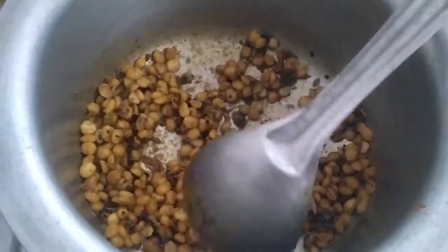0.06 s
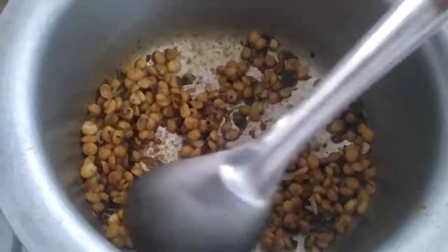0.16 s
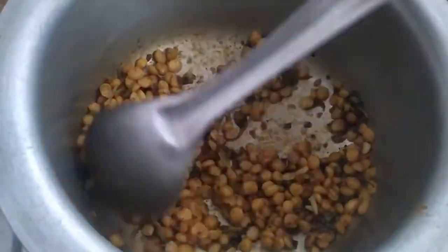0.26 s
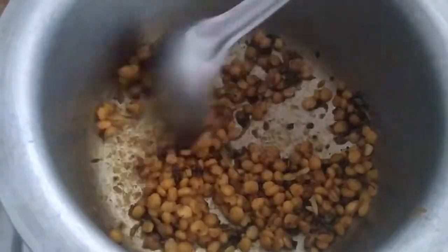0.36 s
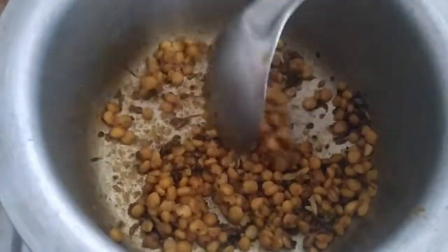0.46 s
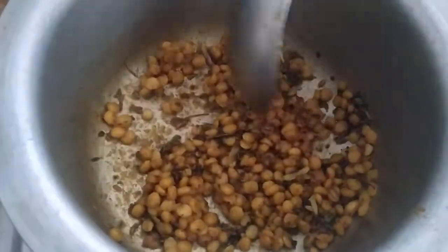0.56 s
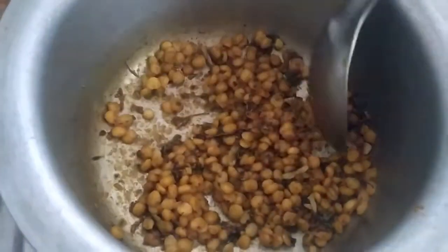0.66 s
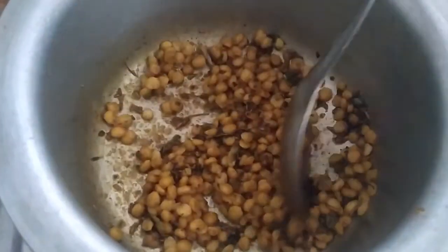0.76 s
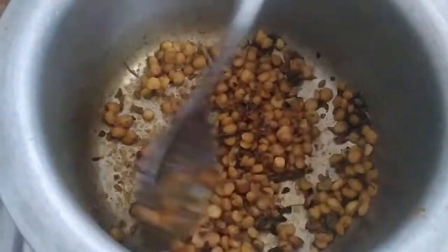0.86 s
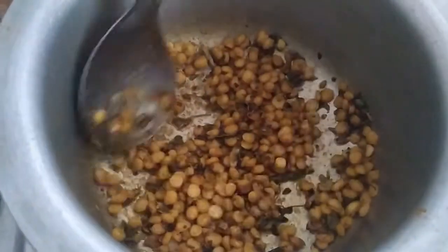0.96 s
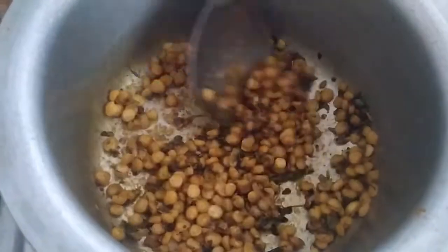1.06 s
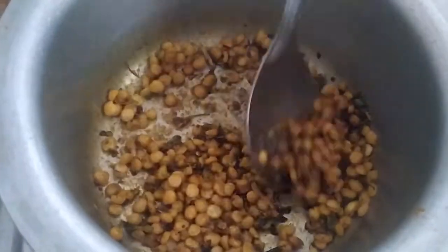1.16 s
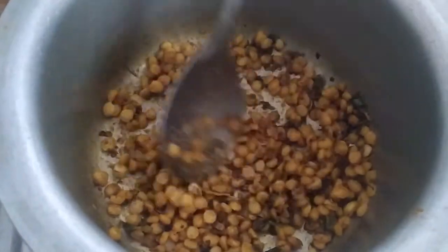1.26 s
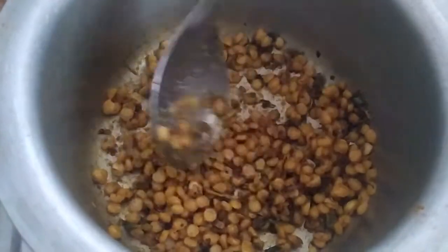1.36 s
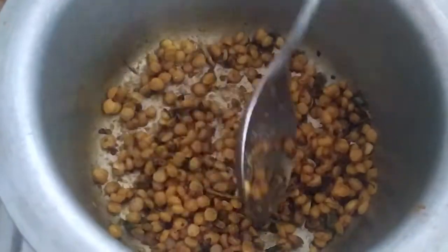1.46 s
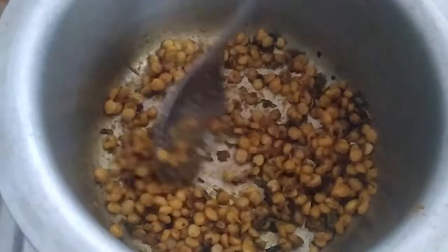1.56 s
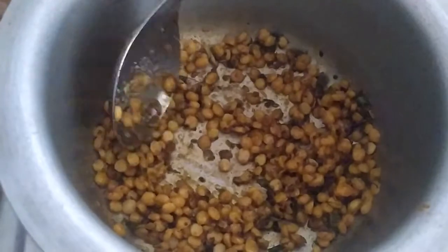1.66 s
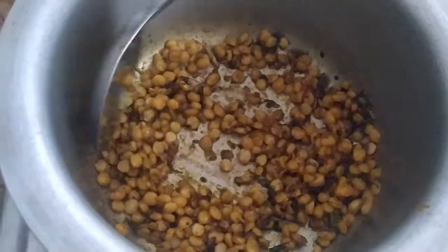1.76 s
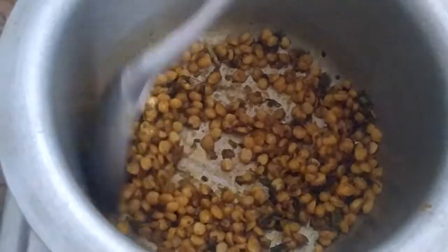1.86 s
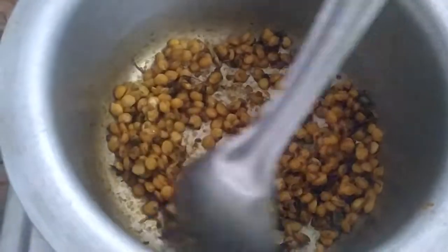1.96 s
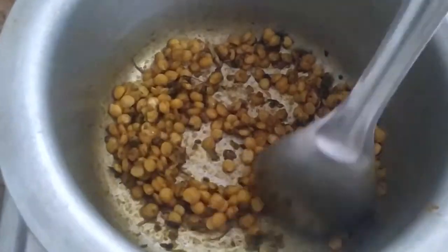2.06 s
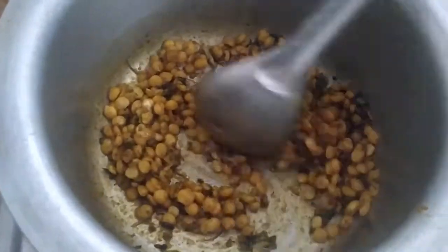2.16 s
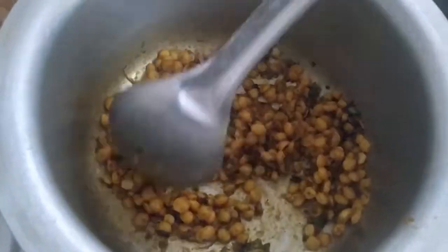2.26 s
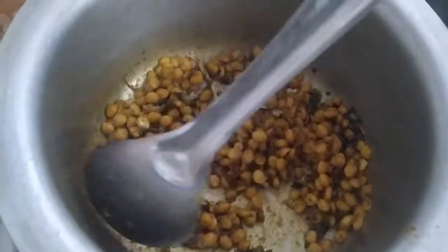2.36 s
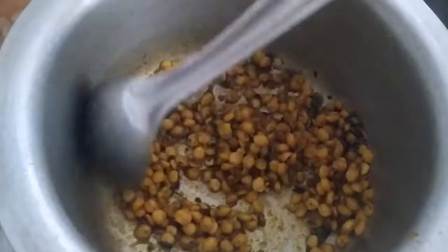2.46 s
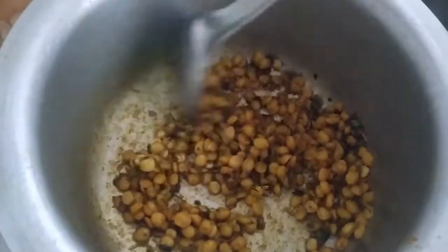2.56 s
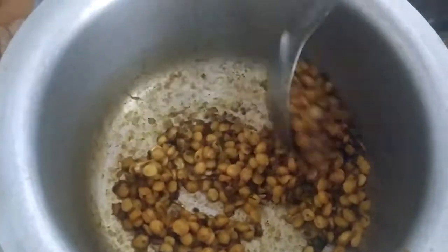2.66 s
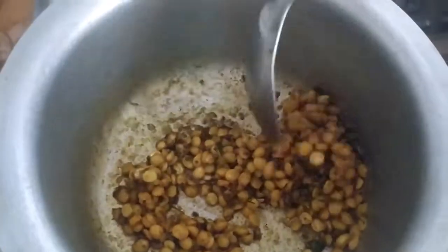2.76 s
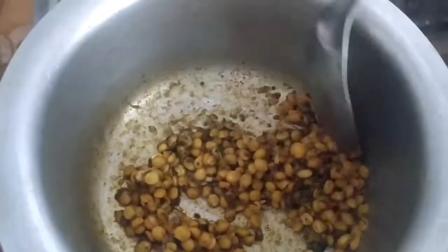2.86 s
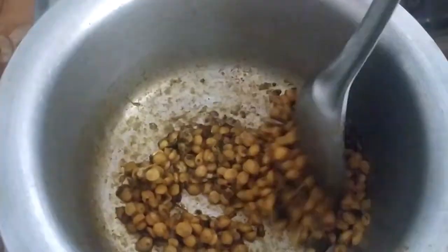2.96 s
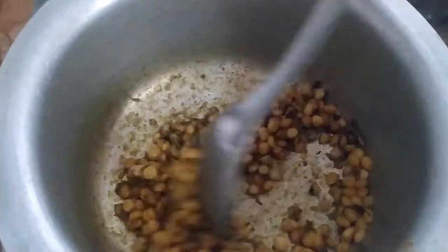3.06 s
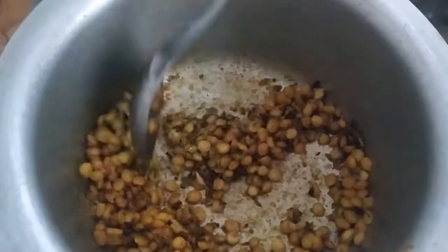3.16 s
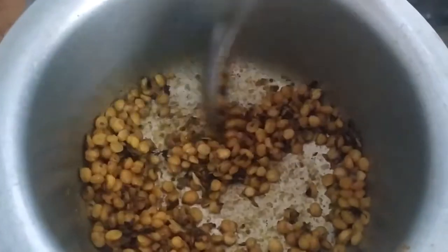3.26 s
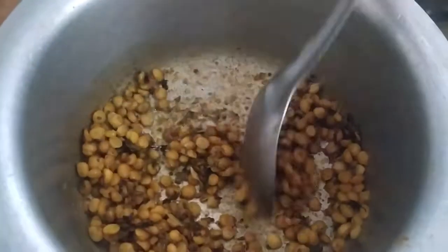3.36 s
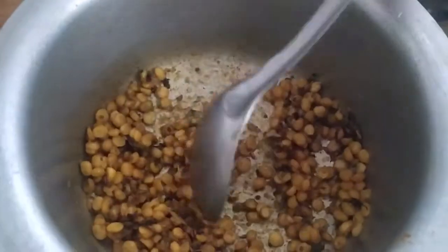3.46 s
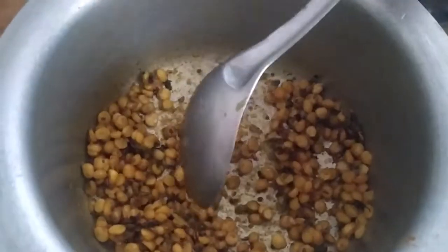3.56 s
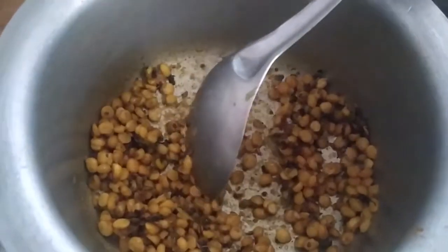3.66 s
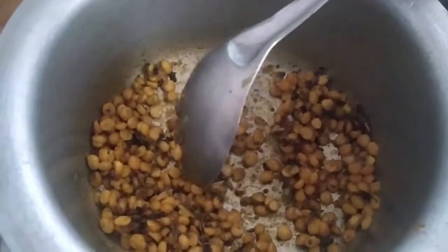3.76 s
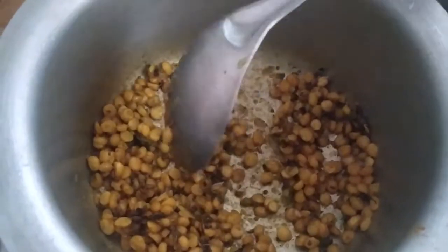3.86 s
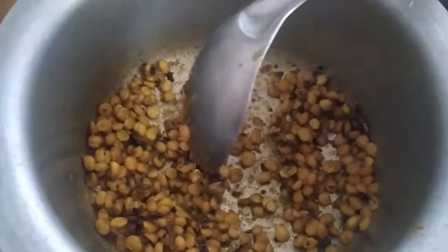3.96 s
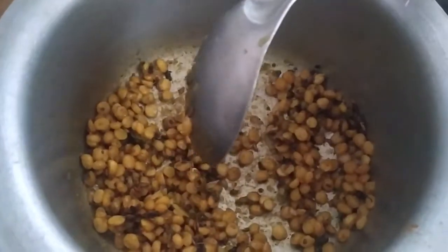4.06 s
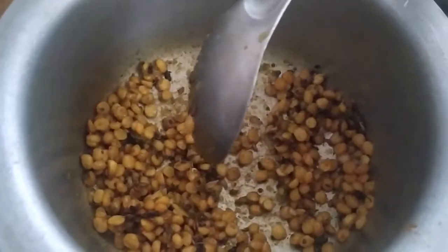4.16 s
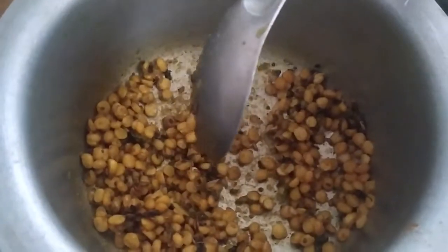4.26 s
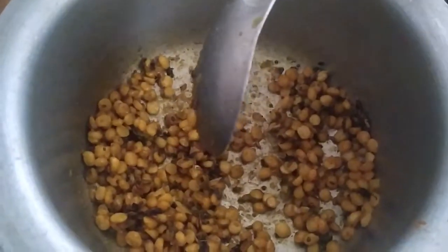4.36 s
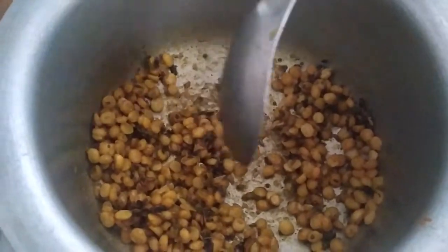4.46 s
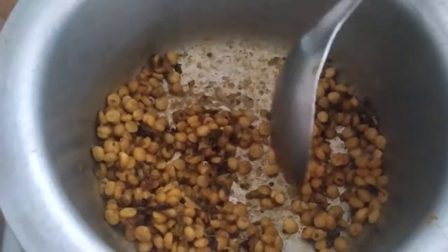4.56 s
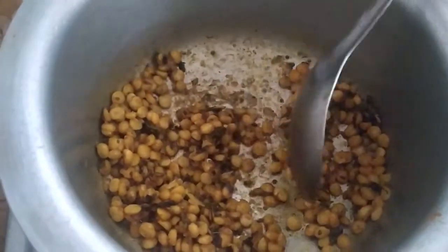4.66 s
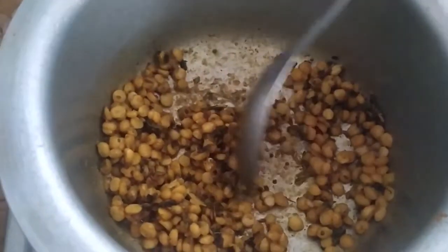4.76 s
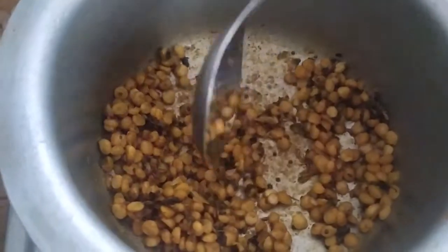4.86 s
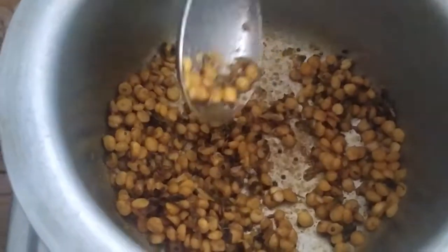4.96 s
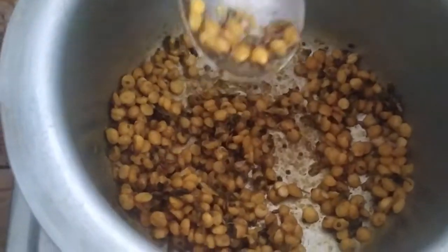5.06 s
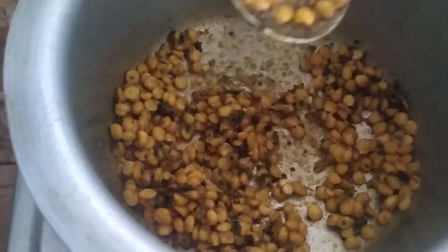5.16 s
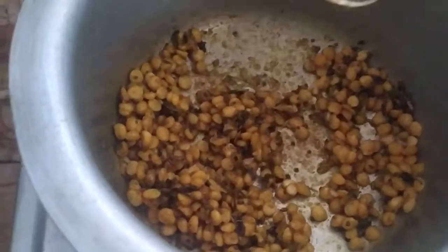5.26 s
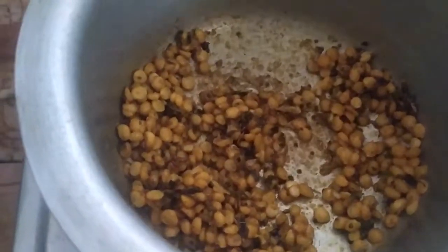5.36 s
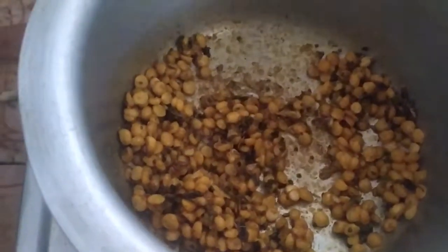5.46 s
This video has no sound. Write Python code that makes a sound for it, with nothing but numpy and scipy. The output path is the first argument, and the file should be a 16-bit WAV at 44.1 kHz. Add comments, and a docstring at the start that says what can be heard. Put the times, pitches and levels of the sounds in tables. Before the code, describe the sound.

Thousands of tiny pops blur into a high frying hiss inside a metal pot, close to the microphone. Dull spoon knocks and short gritty scrapes come in bursts during the first three and a half seconds, with two clear shimmering metal clinks. Then mostly calmer sizzle, a hollow dish dragging on the counter, and a wavering low hum at the end, in a small kitchen.

```python
"""Soaked lentils sizzle in hot oil in a metal pot, close to the microphone in a small kitchen.
The sizzle is random pops and hiss, coloured by the pot; it flares with each stir and settles when left alone.
A steel spoon knocks and scrapes over the loaded bottom (damped modes, rough slips and narrow bands of noise),
and twice clinks against the wall, which rings in beating pairs of modes. Later a dish slides over the
counter (fine slips through its hollow body), above a wavering low hum that grows towards the end."""
import sys
import numpy as np
from scipy import signal
from scipy.fft import rfft, irfft
from scipy.io import wavfile
from scipy.ndimage import uniform_filter1d

SR = 44100
rng = np.random.default_rng(int(sys.argv[2]) if len(sys.argv) > 2 else 0)


def store_wav(level_fs):
    """Save 16-bit WAV to argv[1]."""
    pcm = np.round(np.clip(np.atleast_2d(level_fs), -1, 1) * 32767)
    wavfile.write(sys.argv[1], SR, pcm.T.astype(np.int16))


N = 242991
TIME = np.arange(N) / SR  # s

# relative spectrum of water bursting in the oil: f/Hz, level/dB per Hz
FRY = [(530, -45), (900, -37), (1040, -22), (1250, -21.5), (1530, -12), (1990, -16), (2730, -6.5),
       (3430, -8), (3730, -4), (4010, -6), (8870, 0.5), (12100, -3.5), (14900, -11), (16000, -11)]


def amp(db):
    """Decibels to gain."""
    return 10 ** (np.asarray(db) / 20)


def unit(x):
    """Scales to rms 1."""
    return x / np.sqrt(np.mean(x ** 2) + 1e-20)


def read(points, hz):
    """A spectrum table, joined on a log-frequency axis."""
    f, value = np.transpose(points)
    return np.interp(np.log(hz + 1), np.log(f), value)


def level(rows):
    """A dB curve as a gain for each sample."""
    return amp(np.interp(TIME, *np.transpose(rows)))


def pan(db):
    """Left and right gains for a level difference."""
    gains = amp([[db / 2], [-db / 2]])
    return unit(gains)


def add(mix, s, sound):
    """Mixes a sound in at time s."""
    start = round(s * SR)
    part = mix[:, max(start, 0):max(start + sound.shape[-1], 0)]
    part += sound[..., max(-start, 0):][..., :part.shape[1]]


def colour(x, points):
    """Causal minimum-phase filter with the given spectrum, so that clicks keep their sharp front."""
    hz = abs(np.fft.fftfreq(4096, 1 / SR))
    log_gain = np.log(amp(read(points, hz)))
    response = np.exp(np.conj(signal.hilbert(log_gain)))
    taps = np.fft.ifft(response).real[:2048]
    return signal.oaconvolve(x, taps[None], axes=1)[:, :x.shape[1]]


def ports(x):
    """Two unrelated signals become a microphone pair whose left-right likeness varies with frequency."""
    # likeness of the two microphone ports: f/Hz, correlation (-1 to 1)
    alike = [(60, 0.42), (200, 0.77), (400, 0.64), (700, 0.22), (1300, -0.3), (2500, -0.27), (16000, 0.35)]
    a, b = rfft(x)
    same = np.clip(read(alike, np.fft.rfftfreq(x.shape[1], 1 / SR)), -1, 1)
    mid = a * np.sqrt((1 + same) / 2)
    side = b * np.sqrt((1 - same) / 2)
    return irfft(np.array([mid + side, mid - side]), x.shape[1])


def pops(size, per_s, spread_db):
    """Random clicks of uneven strength that reach each port with their own strength."""
    strength = amp(spread_db * np.minimum(rng.exponential(1, size), 5))
    happens = rng.random(size) < per_s / SR
    return unit(strength * happens * rng.standard_normal((2, size)))


def waver(seconds, size=N):
    """A slow random drift of rms 1 that changes over about this time."""
    width = max(int(seconds * SR), 1)
    once = uniform_filter1d(rng.standard_normal(size), width)
    return unit(uniform_filter1d(once, width))


def room_air():
    """The kitchen's soft rumble: steady noise, strongest in the bass."""
    # relative spectrum of the room's air: f/Hz, level/dB per Hz
    rumble = [(20, -11), (40, -8), (65, -8), (100, -4.5), (125, -5.5), (170, 0), (240, -18.5), (310, -3),
              (400, -11), (650, -3.5), (1000, -10), (2000, -19.5)]
    air_db = -53
    return amp(air_db) * unit(colour(ports(rng.standard_normal((2, N))), rumble))


def hum():
    """A low tone whose pitch and level waver slowly."""
    # the hum grows towards the end: t/s, level/dB
    growth = [(0, -60), (4.3, -61.5), (5.1, -52.5), (5.33, -53.5), (5.45, -46)]
    hum_hz, waver_hz, pitch_waver_s = 72, 3.32, 0.0488
    waver_db, level_waver_s = 1, .1
    tone = np.sin(2 * np.pi * np.cumsum(hum_hz + waver_hz * waver(pitch_waver_s)) / SR)
    return level(growth) * amp(waver_db * waver(level_waver_s)) * tone


def kitchen(x):
    """Dense reflections from hard walls, each band dying at its own speed."""
    # decay of the kitchen's reflections: f/Hz, t60/s
    decay = [(100, 0.89), (500, 0.29), (2000, 0.32), (8000, 0.38), (16000, 0.04)]
    size = SR // 2
    after_gap = np.arange(size) > .004 * SR
    taps = rng.standard_normal((2, size)) * (rng.random((2, size)) < .12) * after_gap
    hz, t, z = signal.stft(ports(taps), SR, nperseg=256)
    dying = z * amp(-60 * t / read(decay, hz)[:, None])
    tail = signal.istft(dying, SR, nperseg=256)[1]
    return signal.oaconvolve(x, tail / np.linalg.norm(tail[0]), axes=1)[:, :N]


def dish():
    """A dish dragged over the counter: fine slips through its hollow body."""
    # relative spectrum of the hollow dish: f/Hz, level/dB per Hz
    body = [(100, -21), (168, 0.5), (200, -2.5), (255, -6.5), (320, 0), (450, 6.5), (570, -6), (720, 0),
            (860, -4.5), (1080, 5.5), (1280, -1), (1800, 0), (3000, -3.5), (6000, -11.5)]
    # nudged with growing force, dragged at an even pace, then coasting to rest
    nudge_s, drag_s, stop_s = 4.07, 4.55, 5.303
    nudge_db, drag_db, grip_s, coast_s = -47, -40.5, 0.0072, 0.056
    nudge = amp(nudge_db) * np.clip((TIME - nudge_s) / (drag_s - nudge_s), 0, 1)
    drag = amp(drag_db) * np.clip((TIME - drag_s) / grip_s, 0, 1)
    coast = np.exp(-np.maximum(TIME - stop_s, 0) / coast_s)
    slips = ports(pops(N, per_s=3500, spread_db=-0.5))
    return np.maximum(nudge, drag) * coast * unit(colour(slips, body))


def rubbing_bands():
    """Narrow bands of noise while things rub: squeaks, a bright rasp, the wall's hum, a dish's low judder."""
    # narrow bands: t/s, length/s, f/Hz, width/Hz, level/dB
    bands = [(0.606, 0.045, 1710, 1400, -44), (0.705, 0.012, 3270, 610, -32), (1.849, 0.04, 2500, 40, -47),
             (1.877, 0.045, 1728, 37, -48.5), (1.874, 0.26, 748, 40, -47.5),
             (1.947, 0.062, 2212, 9.2, -39.5), (1.946, 0.053, 1650, 140, -47.5),
             (1.961, 0.13, 4430, 210, -41.5), (2.58, 0.05, 9080, 90, -34.5), (4.78, 0.13, 164, 10, -53)]
    out = np.zeros((2, N))
    for s, length, hz, width, db in bands:
        size = int(length * SR)
        f = np.fft.rfftfreq(size, 1 / SR)
        passband = 1 / (1 + (2 * (f - hz) / width) ** 2)
        noise = irfft(rfft(rng.standard_normal(size)) * passband, size)
        add(out, s, amp(db) * unit(noise) * signal.windows.tukey(size, .7))
    return out


def bottom_ring():
    """The bottom's answer to one tap: short modes, their onset and colour cushioned by the lentils."""
    # the bottom's modes, damped by the lentils: f/Hz, level before the cushion/dB, t60/s
    bottom_modes = [(115, -30.5, 0.15), (268, -20.5, 0.043), (316.5, -20.5, 0.12), (426, -21, 0.089),
                    (572, 1.5, 0.014), (645, -2, 0.022), (741, -23.5, 0.58), (795, -29, 0.12)]
    # lentils cushion the blow: f/Hz, gain/dB
    cushion = [(30, -20.5), (120, 3.5), (200, -8), (300, 2), (750, -5.5), (950, -15), (1500, -8),
               (4000, -30)]
    t = np.arange(SR // 2) / SR
    modes = sum(amp(db - 60 * t / t60) * np.cos(2 * np.pi * hz * t) for hz, db, t60 in bottom_modes)
    return colour(modes[None] * (1 - np.exp(-t / 0.00037)), cushion)[0]


def lowest_tone(twin=0.56):
    """The wall's lowest mode: a close pair that cancels early and blooms late; a weak neighbour ripples it."""
    t = np.arange(SR) / SR
    late = t - .032  # s, the moment the pair is in opposition
    strong = np.sin(2 * np.pi * 739.2 * late)
    opposed = np.clip(twin, 0, 1) * np.sin(2 * np.pi * 741.7 * late)
    neighbour = amp(-19.5) * np.sin(2 * np.pi * 783 * t)
    fade = amp(-60 * t / .56 + .8 * waver(.02, size=SR))
    swell = 1 - np.exp(-t / .02)
    return (strong - opposed + neighbour) * fade * swell * pan(db=6.5)


def wall_ring(side):
    """The wall's answer to one blow: each mode swells, beats against its twin and dies away."""
    # the wall's modes, each split into twins because the pot is not quite round; a negative share
    # starts in opposition: f/Hz, offset of the twin/Hz, level struck far/dB, level struck near/dB,
    # twin's share far, twin's share near, swell/s, t60/s, left-right/dB, left port leads by/rad
    wall_modes = [(1600, 9, -36, -36, 0.9, -0.4, 0.002, 0.25, 2, -1.1),
                  (1656, -15, -21, -23, 0, -0.7, 0.03, 0.18, 2, -0.8),
                  (1713, 16.5, -19, -11, 0.35, 0.4, 0.025, 0.45, 0.5, 1.65),
                  (1730, -6.4, -28, -18, 1, -1, 0.003, 0.23, -7, 3.7),
                  (2207.5, -15, -25, -22.5, -0.15, 0.55, 0.004, 0.66, 9, 0.2),
                  (2214, -15.6, -26.5, -16.5, 0.55, -1, 0.008, 0.42, -5, -2.0),
                  (2528.5, -4.5, -28.3, -17.7, 0.2, 0.35, 0.03, 0.5, 6, -1.1),
                  (2936, -10, -38, -25, -0.1, -0.6, 0.002, 0.48, 11, 0.9),
                  (3471, -29, -37, -30, -0.2, 0.2, 0.019, 0.4, 4, -1.9),
                  (4143, -6, -32, -27, -0.2, -0.8, 0.002, 0.35, 3, -1.4),
                  (4184, 22, -52, -17, -0.1, -0.3, 0.002, 0.31, 5, 1.7),
                  (4346, -20, -55, -20, 0.3, 0.8, 0.006, 0.29, 3, 2.5),
                  (4532, -25, -23, -19, 0.5, 0.9, 0.002, 0.19, 7, 2.2),
                  (4607, 16, -34, -41, 0.8, -0.9, 0.002, 0.22, 5, 1.6),
                  (4911, 9, -24.5, -20.5, -0.1, -0.75, 0.003, 0.34, 15, -2.3),
                  (5473, 9, -33, -32, -0.3, -0.3, 0.002, 0.4, 6, -1.9),
                  (5798, 4.5, -27.5, -23, 1, -0.7, 0.009, 0.31, 4, -0.6),
                  (6069, 48, -35, -21, -0.9, -0.8, 0.002, 0.16, -3, 1.6),
                  (6219, 30, -26, -18, -0.2, 0.9, 0.002, 0.12, 1, 1.8),
                  (6285, -15, -34, -22, 0.3, 0.3, 0.012, 0.25, 5, -1.4),
                  (6664, 31, -23, -29, -0.5, 0.8, 0.002, 0.12, -8, 2.0),
                  (6786, 12, -24, -20, 0.1, 0.5, 0.012, 0.25, 6, -2.3),
                  (7661, 26, -29, -29, -0.9, 0.1, 0.002, 0.25, -1, 1.6),
                  (7882, -20, -29, -22, 0.7, 0.3, 0.006, 0.25, 5, -1.9),
                  (8789, 48, -30, -41, -0.6, 0.2, 0.002, 0.25, 9, 2.8),
                  (9066, 20, -28, -28, 0.2, -0.9, 0.012, 0.25, 1, -1.1),
                  (9990, -22, -38, -27, -0.9, -0.9, 0.011, 0.21, 3, -0.4)]
    flutter_db, flutter_s = 3, 0.0057  # the moving spoon shades the ring unevenly
    t, ring = np.arange(SR // 2) / SR, np.zeros((2, SR // 2))
    right = np.array([[0], [1]])
    for hz, split, far_db, near_db, far_twin, near_twin, swell, t60, lean_db, lead in wall_modes:
        db, twin = (near_db, near_twin) if side > .5 else (far_db, far_twin)
        turn = 2 * np.pi * hz * t - lead * right
        twin_turn = turn + 2 * np.pi * (split * t + .2 * right)
        pair = np.sin(turn) + twin * np.sin(twin_turn)
        shade_db = flutter_db * waver(flutter_s, size=len(t))
        fade = amp(db + shade_db - 60 * t / t60)
        ring += pan(lean_db) * fade * (1 - np.exp(-t / swell)) * pair
    return ring


def spoon_ring(count=90):
    """The struck spoon's many close high modes, soon damped by the hand."""
    # relative strength of the spoon's modes: f/Hz, level/dB
    spoon_modes = [(3900, -10), (4600, -4), (5300, -3), (6500, 4), (8000, 0.5), (10000, -5.5), (12000, -7),
                   (14000, -9)]
    t60_s = 0.21
    t = np.arange(SR // 4) / SR
    hz = np.linspace(spoon_modes[0][0], spoon_modes[-1][0], count)
    hz = hz + (hz[1] - hz[0]) * rng.uniform(-0.54, 0.49, count)
    modes = sum(amp(read(spoon_modes, f)) * np.sin(2 * np.pi * (f * t + rng.random((2, 1)))) for f in hz)
    return unit(modes) * amp(-60 * t / t60_s)


def scrapes():
    """Uneven slips of the edge shake the bottom, rasp on the metal and faintly ring the wall."""
    # spoon strokes: t/s, length/s, grind of the bottom: level/dB, rasp of the edge: level/dB
    strokes = [(-.03, 0.05, -44.5, -31.5), (0.263, 0.16, -51, -42.5), (0.71, 0.083, -45, -34.5),
               (1.511, 0.062, -50.5, -37), (1.842, 0.19, -42.5, -40.5), (2.015, 0.174, -47.5, -37.5),
               (2.406, 0.062, -37, -28.5), (2.479, 0.12, -41, -33.5), (2.572, 0.068, -51, -28),
               (3.158, 0.045, -39, -45), (3.224, 0.051, -49, -30.5), (3.311, 0.064, -45, -35)]
    # relative spectrum of the rasping edge: f/Hz, level/dB per Hz
    edge = [(600, -16), (1900, -13), (2900, 1.5), (4000, 1), (5200, -4), (6500, 2), (8000, -3), (9300, 1),
            (12000, -3), (16000, -13.5)]
    out = np.zeros((2, N))
    slips = ports(pops(N, per_s=260, spread_db=1.5))
    grind = unit(signal.oaconvolve(slips, bottom_ring()[None], axes=1)[:, :N])
    rasp = unit(colour(pops(N, per_s=9000, spread_db=1), edge))
    catching = amp(1.5 * waver(.012))
    push = np.zeros(N)
    for s, length, grind_db, rasp_db in strokes:
        progress = np.clip((TIME - s) / length, 0, 1)
        pressure = catching * np.sqrt(abs(np.sin(np.pi * progress)))
        push += amp(grind_db) * pressure
        out += amp(rasp_db) * pressure * rasp
    wall = wall_ring(0)
    ringing = signal.oaconvolve(push * slips, wall / np.linalg.norm(wall[0]), axes=1)[:, :N]
    return out + push * grind + amp(-5.5) * ringing


def knocks():
    """The spoon lands through the lentils: dull thud, short tick of the edge, low boom, faint wall tone."""
    # spoon down on the bottom: t/s, thud before a 3 dB cut: level/dB, tick: level/dB, tick decay/s,
    # lowest tone of the wall: level/dB, boom of the pot: level/dB
    landings = [(.258, -14.5, -35.5, 0.027, -33.5, -59), (.3665, -22.5, -37, .02, -38, -68),
                (.711, -14, -37, .02, -39.5, -50.5), (1.951, -22.5, -30, 0.012, -48, -62),
                (1.996, -23, -35, 0.0066, -42, -59), (2.022, -30, -43, .008, -46, -66),
                (2.124, -25, -31.5, .008, -42.5, -54), (2.164, -34, -30, 0.0034, -57, -66),
                (2.4114, -32, -32, 0.022, -50, -70), (2.4278, -2.5, -22.5, 0.031, -33.5, -62),
                (2.459, -17, -30, 0.029, -52, -72), (2.468, -15, -32, 0.026, -52, -72),
                (2.524, -19.5, -38, .008, -58, -69), (2.537, -14.5, -37, .012, -61, -69),
                (2.552, -22.5, -35, .012, -66, -66), (3.17, -21.5, -46, .028, -38, -45.5)]
    # relative spectrum of the edge's tick: f/Hz, level/dB per Hz
    tick_spectrum = [(500, -23), (1100, 4), (1700, -0.5), (2400, 3.5), (3250, 0.5), (4200, -4), (6300, 1.5),
                     (9500, -1), (16000, -13)]
    # the whole pot shudders on its stand: f/Hz, level/dB per Hz
    shudder = [(40, -28), (75, -5), (180, -4.5), (300, 3), (700, -34)]
    boom_decay_s = 0.11
    rebound_s, rebound_db = 0.0045, -18  # the spoon touches again just after it lands
    out, thud = np.zeros((2, N)), bottom_ring()
    t = np.arange(len(thud)) / SR
    for s, thud_db, tick_db, tick_s, low_db, boom_db in landings:
        tick = unit(colour(rng.standard_normal((2, len(t))), tick_spectrum)) * np.exp(-t / tick_s)
        blow = amp(thud_db - 3.0) * thud * pan(db=1.0)
        add(out, s, blow + amp(tick_db) * tick)
        add(out, s + rebound_s, amp(rebound_db) * blow)
        rumble = unit(colour(ports(rng.standard_normal((2, len(t)))), shudder))
        add(out, s, amp(boom_db) * rumble * np.exp(-t / boom_decay_s))
        add(out, s, amp(low_db) * lowest_tone())
    return out


def clinks():
    """Steel clashes on the wall; the spoon shimmers briefly and the wall rings on."""
    # spoon against the wall: t/s, wall ring: level/dB, steel clash: level/dB, ring of the spoon: level/dB,
    # side (0 far, 1 near), lowest tone: level/dB, share of its twin (0-1)
    strikes = [(0.923, -1.5, -20, -18.5, 0, -23.5, 0.65), (2.856, -0.5, -14, -25, 1, -17.5, 0.97)]
    # relative spectrum of steel on steel: f/Hz, level/dB per Hz
    steel = [(200, -13.5), (700, -5.5), (1100, -8.5), (1700, 2.5), (3300, -6), (4350, 2.5), (5200, -6.5),
             (6300, 6.5), (7200, -17), (8000, -1.5), (11000, 2.5), (16000, -11)]
    out, t = np.zeros((2, N)), np.arange(SR) / SR
    for s, db, clash_db, spoon_db, side, low_db, twin in strikes:
        crack = np.exp(-t / 0.0026) + amp(-6.5) * np.exp(-t / 0.044)
        clash = unit(colour(rng.standard_normal((2, SR)), steel)) * crack
        add(out, s, amp(db) * wall_ring(side))
        add(out, s, amp(spoon_db) * spoon_ring())
        add(out, s, amp(clash_db) * clash + amp(low_db) * lowest_tone(twin))
    return out


def spits():
    """Now and then a larger drop of water bursts in the oil: a very short burst of noise."""
    # large bursts: t/s, level/dB
    drops = [(.172, -21), (.506, -29), (3.906, -25)]
    decay_s = 0.00092
    out, t = np.zeros((2, N)), np.arange(SR // 20) / SR
    for s, db in drops:
        burst = unit(colour(rng.standard_normal((2, len(t))), FRY))
        add(out, s, amp(db) * burst * np.exp(-t / decay_s))
    return out


def in_pot(x, echo=0.86, count=10):
    """Quick echoes off the pot and the moving spoon ripple the hiss; their strengths drift."""
    out, steps = x.copy(), np.linspace(0, TIME[-1], num=40)
    for port, wave in zip(out, x):
        for delay_s in rng.uniform(.0004, .006, count):
            strength = np.interp(TIME, steps, rng.uniform(-0.59, 1, len(steps)))
            port += echo * strength * np.roll(wave, int(delay_s * SR))
    return out


def boil():
    """How hard the oil boils: the liveliest flare of the moment over a calm simmer."""
    # each stir turns wet lentils on to the hot metal and the boil flares: t/s, level before sizzle's gain/dB
    stirs = [(-.2, -37.5), (.33, -37), (.66, -36), (.95, -34), (1.48, -37), (1.92, -35), (2.88, -34.5)]
    flare_s, settle_db_per_s = 0.067, 6.5  # a flare rises quickly, then settles
    calm_db = -41  # before sizzle's gain
    flutter_db, flutter_s = .5, 0.028  # the boil's own unevenness
    flares = []
    for s, db in stirs:
        rise = np.clip((TIME - s) / flare_s, 0, 1)
        flares.append(rise * amp(db - settle_db_per_s * (TIME - s)))
    return np.hypot(amp(calm_db), np.max(flares, axis=0)) * amp(flutter_db * waver(flutter_s))


def sizzle():
    """Steam bursts through the oil in thousands of tiny pops; the smallest blur into a hiss."""
    bursts = pops(N, per_s=4500, spread_db=2.6) + amp(-2) * rng.standard_normal((2, N))
    frying = unit(colour(in_pot(bursts), FRY))
    return amp(5.5) * boil() * frying * pan(db=0.8)


def scene():
    """Everything in the pot and on the counter; knocks, clinks and rubbing also reflect from the kitchen."""
    thuds, rings, rubs = knocks(), clinks(), scrapes() + rubbing_bands()
    echo = kitchen(amp(-9.0) * thuds + amp(-15.5) * rings + amp(-3.0) * rubs)
    background = room_air() + hum()
    return background + dish() + echo + rubs + thuds + rings + spits() + sizzle()


def record(dry):
    """The recorder's band limit: a steep low-pass."""
    cut_hz = 15950
    taps = signal.firwin(511, cut_hz, window=("kaiser", 9), fs=SR)
    return signal.oaconvolve(dry, taps[None], "same")


dry = scene()
out = record(dry)
store_wav(out)
```